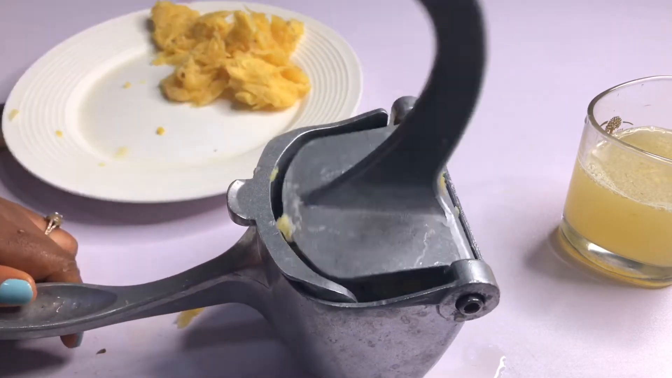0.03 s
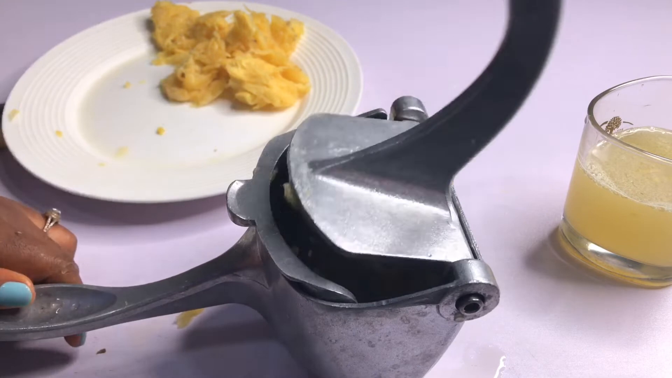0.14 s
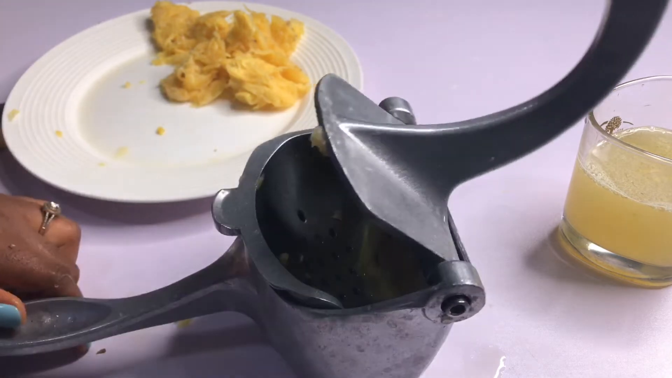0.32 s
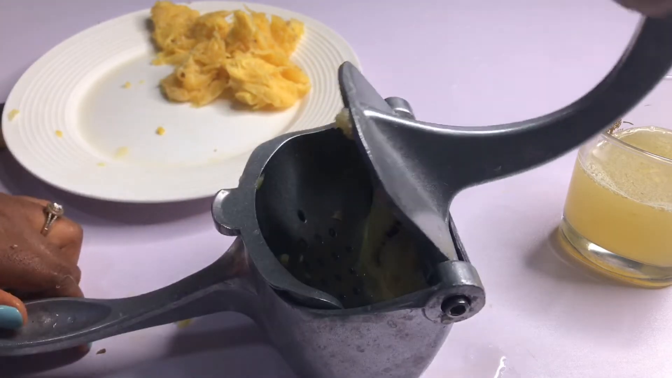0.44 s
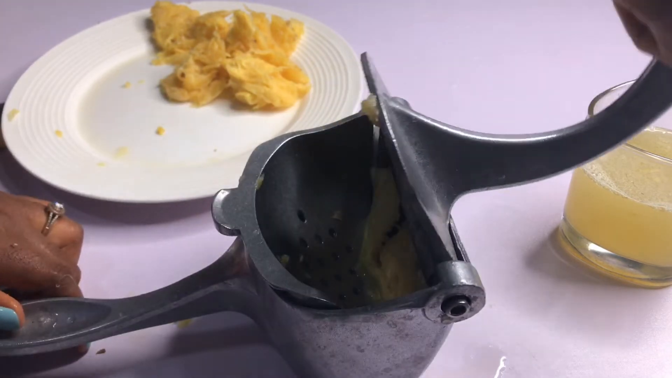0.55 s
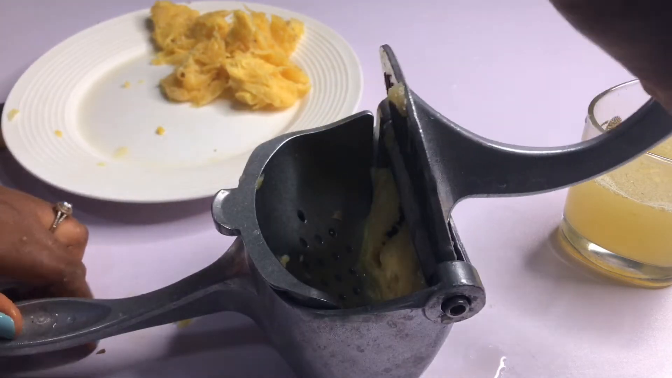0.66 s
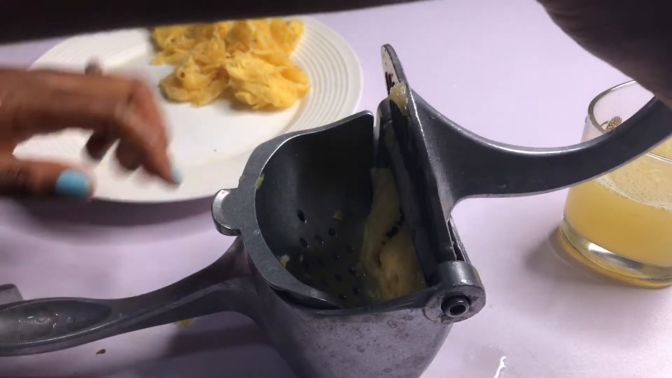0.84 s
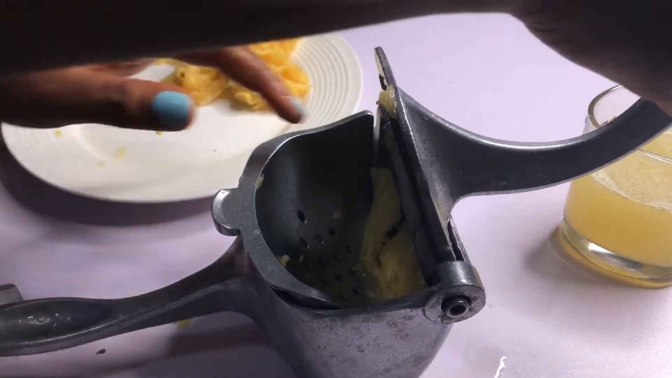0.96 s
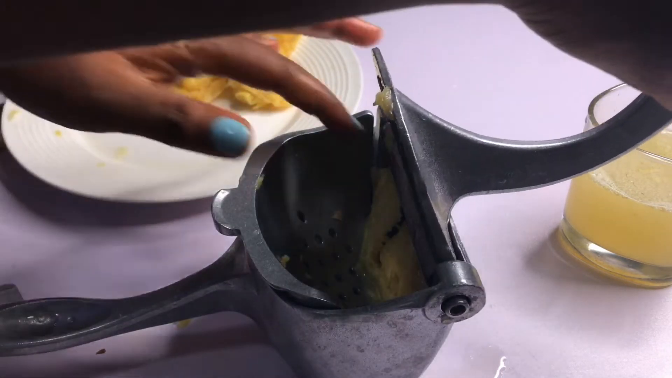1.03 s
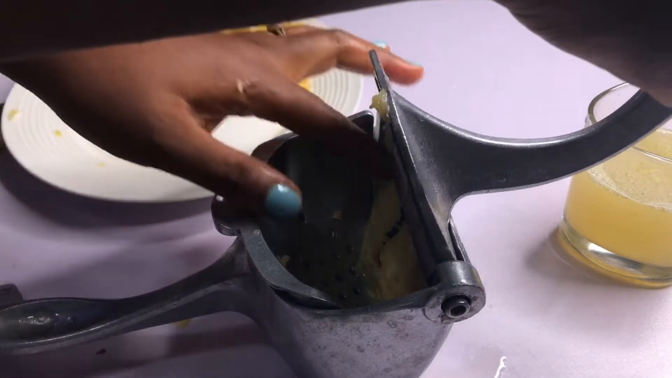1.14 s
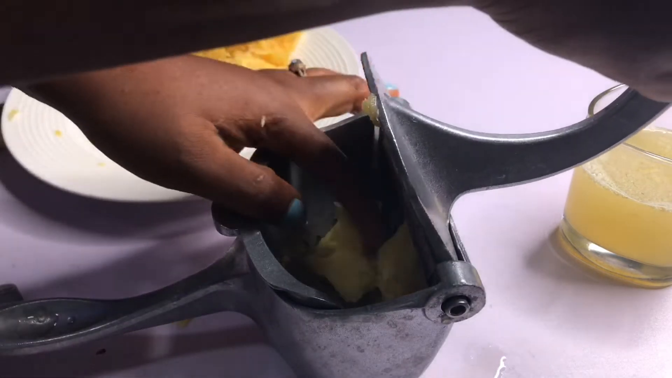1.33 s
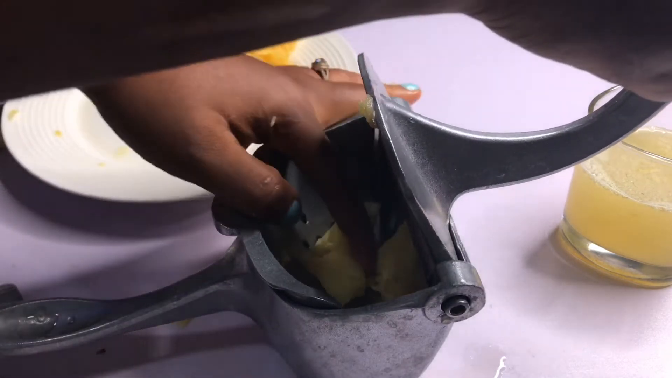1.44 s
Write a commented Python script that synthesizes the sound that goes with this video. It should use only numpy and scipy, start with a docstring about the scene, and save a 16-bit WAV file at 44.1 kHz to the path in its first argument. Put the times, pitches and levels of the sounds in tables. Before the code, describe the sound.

Loud metallic clack of a cast-metal juicer lever swung open, followed by light knocks over faint hum

```python
"""Faint hum, hiss and scraping come first as the lever of a cast-metal hand juicer is swung open: thin squeaks
(gliding sines), then a loud clack against its stop (noise cracks and decaying metal and table modes).
Softer knocks follow (the same blows, and grainy sine taps), then fingers pick at wet pulp (tiny sine ticks).
Friction is gritty coloured noise; a small hard room (decaying noise bands) rings after every blow.
An appliance hums on throughout (wandering sines over coloured noise)."""
import sys
import numpy as np
from scipy import signal
from scipy.fft import rfft, irfft
from scipy.io import wavfile
from scipy.ndimage import uniform_filter1d

SR = 44100
rng = np.random.default_rng(int(sys.argv[2]) if len(sys.argv) > 2 else 0)


def store_pcm(level_fs):
    """Save levels as 16-bit WAV."""
    pcm = np.round(np.clip(level_fs, -1, 1) * 32767).astype(np.int16)
    wavfile.write(sys.argv[1], SR, np.atleast_2d(pcm).T)


def invert_db(level):
    """Linear amplitude ratio for a level in decibels (20 dB per decade), elementwise."""
    return 10 ** (np.asarray(level, dtype=float) / 20)


N = 66150
T_S = np.arange(N) / SR
LEAD = SR // 5  # samples kept before time 0, for a blow that starts earlier

# modes of the cast juicer at full ring share [mode_hz, level_db, t60_s]
METAL_MODES = [(627.6, 2.5, 0.17), (855, 0.5, 0.3), (952.4, -3, 0.4), (1298, -9.5, 0.18), (1559, -3, 0.14),
               (1745, -6.5, 0.15), (1855, -4, 0.1), (1980, -3, 0.17), (2491, -6, 0.18), (2710, -9.5, 0.097),
               (4000, -9, 0.03), (5357, 2.5, 0.14), (6760, -17, 0.4), (7480, -11, 0.05)]
# modes of the table under it at full ring share [mode_hz, level_db, t60_s]
TABLE_MODES = [(91.3, 0.5, 0.21), (172.9, 0, 0.26), (193.8, -0.5, 0.29), (226.7, -5, 0.34),
               (293, 2.5, 0.29), (308.1, -5, 0.27), (402.9, -2.5, 0.23)]
# finger and nail taps on the damped cup [start_s, level_db, pitch_hz, t60_s]
TAPS = [(0.2265, -43.5, 2900, 0.05), (0.6132, -33.5, 1150, 0.012), (0.616, -51, 4540, 0.017),
        (.616, -48, 2483, 0.028), (.901, -47, 600, 0.026), (.902, -48.5, 1332, .03),
        (1.07, -26.5, 2527, 0.017), (1.0706, -28.5, 1353, 0.018), (1.0715, -43, 8000, 0.0071),
        (1.0695, -53, 4650, .015), (1.083, -62, 6200, 0.025), (1.2155, -39.5, 1350, 0.02),
        (1.2196, -43, 1464, 0.035), (1.228, -58.5, 3100, 0.053), (1.281, -57.5, 3520, 0.043),
        (1.312, -57, 3470, .05), (1.311, -40.5, 1348, 0.041)]
# blows [start_s, level_db (before a common 1/4 gain), top_hz, table_level_db, ring_share (0-1)]
BLOWS = [(-.06, -40.5, 2400, -34, 0.83), (0.2147, -49, 7040, 5, 0.5), (0.2377, -5, 13000, -1.5, 0.9),
         (0.2453, -15.5, 5000, -7.5, 0.04), (0.2497, -11.5, 3530, -11.5, 0.21),
         (0.2569, -16, 4000, -8.5, 0.6), (0.2656, -16, 3000, -8.5, 0.2), (0.61, -48.5, 2500, -11, .3),
         (0.6129, -41.5, 3500, 3, 0.42), (0.6154, -43.5, 5543, -14, .25), (0.6753, -45, 6010, -18, 0.15),
         (.9015, -61.5, 2186, 1, .3), (1.0709, -25.5, 7500, -2, 0.06), (1.077, -39, 4410, 6, 0.89),
         (1.0813, -51, 7060, 8.5, 0.3), (1.0901, -56.5, 4500, 7, 0.5), (1.2175, -44, 4000, 1, 0.1),
         (1.22, -52, 3400, 10, 0.8), (1.3095, -47, 4530, -12, 0), (1.3142, -41, 4990, 4, 0)]
# spectrum of the contact crack [freq_hz, relative_db]
CRACK_COLOUR = [(50, -28), (150, -15), (300, -8), (520, -16), (900, -6.5), (2000, -4.5), (4000, -14),
                (6000, -18), (10000, -27), (14000, -27), (16500, -17)]
# friction of lever and fingers on metal [time_s, rms_level_db]
SCRAPE_LEVEL = [(0, -59.5), (.05, -65), (.075, -81), (.19, -63.5), (.21, -54), (.236, -52), (.25, -101),
                (.8, -88.5), (.85, -71), (1.0, -80), (1.045, -95), (1.062, -52), (1.069, -61.5),
                (1.075, -56.5), (1.09, -55.5), (1.2, -64.5), (1.27, -57), (1.3, -64), (1.315, -55),
                (1.345, -72), (1.37, -87), (1.5, -97)]
# spectrum of that friction [freq_hz, relative_db]
SCRAPE_COLOUR = [(100, -22), (300, -10.5), (900, 0.5), (1500, -10), (3000, -19), (5000, -23), (9000, -30),
                 (16000, -37)]
# wet ticks of the pulp [start_s, peak_db, pitch_hz, t60_s]
TICKS = [(1.156, -69, 3740, 0.006), (1.1745, -54.5, 15000, .002), (1.1765, -42.5, 12140, 0.0016),
         (1.2025, -54, 12900, 0.0015), (1.2295, -48.5, 13240, 0.0018), (1.2325, -64, 7000, 0.00383),
         (1.2827, -51, 14300, .002), (1.3075, -49.5, 11700, .002), (1.3165, -51, 13700, 0.0018),
         (1.332, -51.5, 13300, 0.0023), (1.3349, -49.5, 4000, 0.0064), (1.4067, -43, 13400, 0.0015),
         (1.407, -54, 4180, 0.0036), (1.4103, -56, 5017, 0.0031), (1.4171, -54.5, 4010, .004),
         (1.433, -55.5, 4200, 0.0042), (1.4441, -51, 14260, 0.0017), (1.468, -62, 13800, 0.0028)]
# thin squeaks [start_s, length_s, level_db, start_hz, end_hz]
SQUEAKS = [(0.086, 0.041, -79.5, 14000, 13100), (0.193, 0.029, -65.5, 2460, 2380),
           (1.276, 0.013, -71.5, 6305, 6000), (1.277, 0.011, -74, 9050, 9050),
           (1.293, 0.03, -70, 14500, 13400)]
# room decay [freq_hz, t60_s]
ROOM_T60 = [(90, 0.97), (250, 0.1), (700, 0.61), (1500, 0.5567), (3000, 0.5), (6000, 0.42), (11000, 0.32),
            (16000, 0.15)]
# room level [freq_hz, level_db]
ROOM_LEVEL = [(90, -7.5), (250, 2.5), (480, -0.5), (800, -0.5), (1500, -7), (3000, -7.5), (6000, -8),
              (11000, -7.5), (16000, -4)]
# spectrum of background hiss and rumble [freq_hz, relative_db]
FLOOR_COLOUR = [(15, -35.5), (25, 2), (265, -5), (581, -22.5), (742, -21.5), (1380, -23.5), (1630, -26.5),
                (1770, -29), (2880, -32), (3990, -34.5), (13900, -40.5), (16300, -32)]
# appliance hum bands [centre_hz, level_db, wander_hz]
HUM = [(105, -66, 11), (179, -72, 4.3), (236.4, -61.5, 1.5), (315, -68, 25)]

METAL_RISE_S, TABLE_RISE_S, TAP_RISE_S, ROOM_RISE_S = 0.0022, 0.008, 0.00044, 0.001  # time constants
CRACK_DB, CRACK_T60_S = 14, 0.052  # t60 at full ring share
WOBBLE_DB, RING_ROOM_DB = 3.1, -12.5
TAP_GRAIN, SQUEAK_WAVER = 0.2, 0.016  # spreads, as shares of amplitude and of pitch
FLOOR_DB, RUMBLE_SWAY_DB, RUMBLE_TOP_HZ = -56.5, -0.5, 350


def curve(table, at, log=False):
    """Reads a two-column table with straight lines, over log x if asked."""
    x, y = np.array(table, float).T[:2]
    if log:
        return np.interp(np.log(at + 1e-9), np.log(x), y)
    return np.interp(at, x, y)


def unit(x):
    """Scales to rms 1."""
    return x / np.sqrt(np.mean(x ** 2))


def colour(table, size):
    """Noise of rms 1 with the spectrum of a (freq_hz, relative_db) table."""
    freq_hz = np.fft.rfftfreq(size, 1 / SR)
    spectrum = rfft(rng.standard_normal(size)) * invert_db(curve(table, freq_hz, log=True))
    return unit(irfft(spectrum, size))


def walk(rate_hz):
    """Smooth random sway of rms 1."""
    width = max(int(SR / rate_hz), 2)
    noise = rng.standard_normal(N)
    return unit(uniform_filter1d(uniform_filter1d(noise, width), width))


def fade(t_s, t60_s):
    """Exponential decay, 60 dB in t60_s."""
    return np.exp(-np.log(1000) * t_s / t60_s)


def rise(t_s, time_s):
    """Exponential build-up from 0 to 1."""
    return 1 - np.exp(-t_s / time_s)


def add(out, x, start_s):
    """Mixes x in at start_s; out starts LEAD samples early."""
    i = int(round(start_s * SR)) + LEAD
    out[i:i + len(x)] += x[:len(out) - i]


def rings(modes, t_s, t60_share, scatter_db):
    """Decaying modes, each struck a little differently and wobbling as loose parts chatter."""
    luck = rng.standard_normal(len(modes))
    out = np.zeros(len(t_s))
    for k, (mode_hz, level_db, t60_s) in enumerate(modes):
        gain = invert_db(level_db + scatter_db * luck[k] + WOBBLE_DB * walk(90)[:len(t_s)])
        tone = np.sin(2 * np.pi * mode_hz * t_s) * fade(t_s, t60_s * t60_share)
        out += (-1) ** k * gain * tone
    return out


def blows():
    """Each blow cracks, rings the metal and shakes the table; a low ring share damps all three."""
    cracks, ringing = np.zeros(N + LEAD), np.zeros(N + LEAD)
    t_s = T_S[:SR // 2]
    for start_s, level_db, top_hz, table_db, share in BLOWS:
        share = np.clip(share, 0.03, 1.5)
        dull = signal.butter(2, min(top_hz, SR * 0.45), fs=SR, output="sos")
        crack = invert_db(CRACK_DB) * colour(CRACK_COLOUR, len(t_s)) * fade(t_s, CRACK_T60_S * share)
        metal = share ** 2 * rings(METAL_MODES, t_s, share, 1.0) * rise(t_s, METAL_RISE_S)
        table = rings(TABLE_MODES, t_s, np.sqrt(share), 0.9) * rise(t_s, TABLE_RISE_S)
        body = signal.sosfilt(dull, metal) + invert_db(table_db) * table
        gain = invert_db(level_db) / 4
        add(cracks, gain * signal.sosfilt(dull, crack), start_s)
        add(ringing, gain * body, start_s)
    return cracks, ringing


def taps():
    """Compact, rough knocks on metal held by the hand: a note that the skin makes grainy."""
    out, t_s = np.zeros(N + LEAD), T_S[:SR // 20]
    for start_s, level_db, pitch_hz, t60_s in TAPS:
        grain = 1 + TAP_GRAIN * walk(pitch_hz)[:len(t_s)]
        envelope = fade(t_s, t60_s) * rise(t_s, TAP_RISE_S)
        add(out, invert_db(level_db) * grain * np.sin(2 * np.pi * pitch_hz * t_s) * envelope, start_s)
    return out


def scrape():
    """Gritty friction that catches and slips: coloured noise with slow and fast random gain."""
    grit = invert_db(2.6 * walk(120) + 0.83 * walk(600))
    return unit(colour(SCRAPE_COLOUR, N) * grit) * invert_db(curve(SCRAPE_LEVEL, T_S))


def squeaks():
    """Short wavering whistles of dry or wet rubbing: gliding sines."""
    out, waver = np.zeros(N + LEAD), walk(200)
    for start_s, length_s, level_db, start_hz, end_hz in SQUEAKS:
        n = int(length_s * SR)
        sway = 1 + SQUEAK_WAVER * waver[int(start_s * SR):][:n]
        pitch_hz = np.linspace(start_hz, end_hz, n) * sway
        tone = np.sqrt(2) * np.sin(2 * np.pi * np.cumsum(pitch_hz) / SR)
        add(out, invert_db(level_db) * signal.windows.tukey(n, 0.4) * tone, start_s)
    return out


def ticks():
    """Tiny films of juice snapping: sines that die within milliseconds."""
    out, t_s = np.zeros(N + LEAD), T_S[:SR // 50]
    for start_s, peak_db, pitch_hz, t60_s in TICKS:
        add(out, invert_db(peak_db) * np.sin(2 * np.pi * pitch_hz * t_s) * fade(t_s, t60_s), start_s)
    return out


def room(x):
    """Dense reflections: noise in half-octave steps, each dying at its own rate."""
    t_s, freq_hz = T_S[:SR], np.fft.rfftfreq(SR, 1 / SR)
    noise = rfft(rng.standard_normal(SR))
    tail = np.zeros(SR)
    for step in range(18):
        mid_hz = 45 * 2 ** (step / 2)
        band = np.clip(1 - 2 * np.abs(np.log2(freq_hz / mid_hz + 1e-9)), 0, 1)
        t60_s = curve(ROOM_T60, mid_hz, log=True)
        even_energy = np.sqrt(2 * np.log(1000) / t60_s / SR)  # level independent of t60
        gain = invert_db(curve(ROOM_LEVEL, mid_hz, log=True)) * even_energy
        tail += irfft(noise * band, SR) * fade(t_s, t60_s) * gain
    return signal.fftconvolve(x, tail * rise(t_s, ROOM_RISE_S))[:len(x)]


def floor():
    """Hiss, a swaying low rumble and narrow hum bands of an appliance."""
    air = colour(FLOOR_COLOUR, N)
    low = signal.sosfiltfilt(signal.butter(2, RUMBLE_TOP_HZ, fs=SR, output="sos"), air)
    out = invert_db(FLOOR_DB) * (air - low + low * invert_db(RUMBLE_SWAY_DB * walk(3.2)))
    for centre_hz, level_db, wander_hz in HUM:
        pitch_hz = centre_hz + wander_hz * walk(26)
        tone = np.sqrt(2) * np.sin(2 * np.pi * np.cumsum(pitch_hz) / SR)
        out += invert_db(level_db) * tone * invert_db(2.0 * walk(10))
    return out


def scene():
    """Juicer and fingers over the background; rings carry less into the room than cracks."""
    cracks, ringing = blows()
    cracks = cracks + np.r_[np.zeros(LEAD), scrape()]
    ringing = ringing + taps()
    near = cracks + ringing + room(cracks + invert_db(RING_ROOM_DB) * ringing)
    sources = near + ticks() + squeaks()
    return (sources[LEAD:] + floor())[None]


def low_pass(x):
    """Removes everything above the highest recorded frequency."""
    return signal.sosfilt(signal.butter(12, 16490, fs=SR, output="sos"), x)


def record(dry):
    """The phone thins the deep bass, cannot pass full scale and cuts the top."""
    thinned = signal.sosfilt(signal.butter(3, 70, "high", fs=SR, output="sos"), dry)
    clipped = np.clip(thinned, -1, 1)
    mix = signal.sosfilt(signal.ellip(8, 0.3, 70, 15800, fs=SR, output="sos"), clipped)
    return low_pass(mix)


dry = scene()
out = record(dry)
store_pcm(out)
```